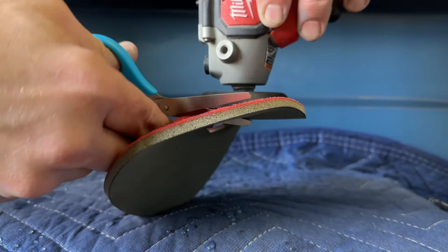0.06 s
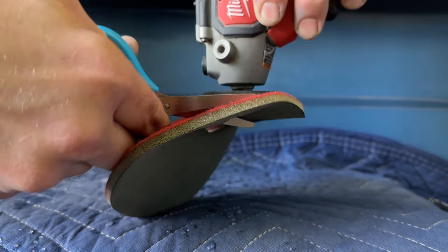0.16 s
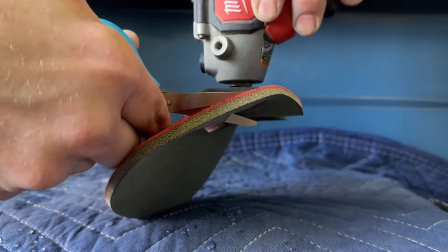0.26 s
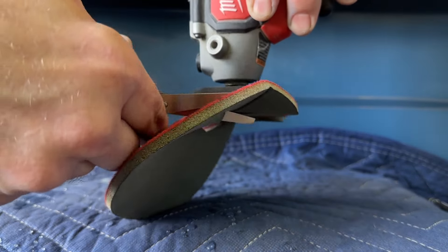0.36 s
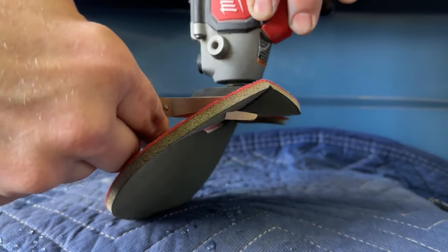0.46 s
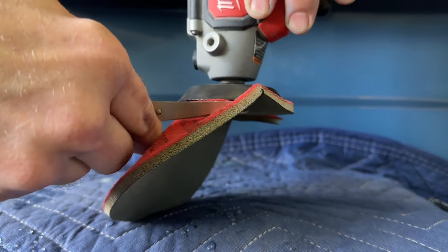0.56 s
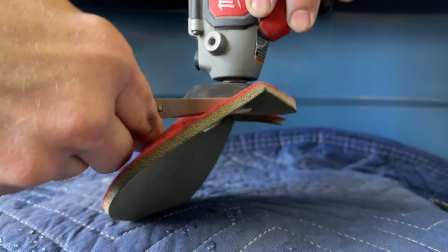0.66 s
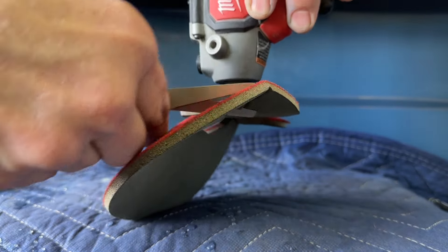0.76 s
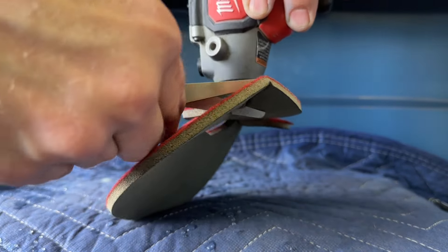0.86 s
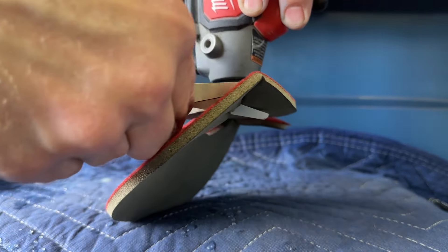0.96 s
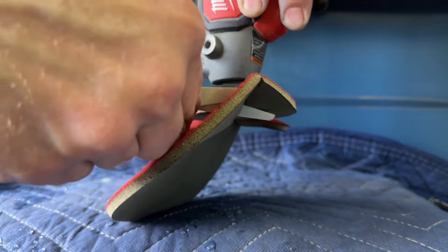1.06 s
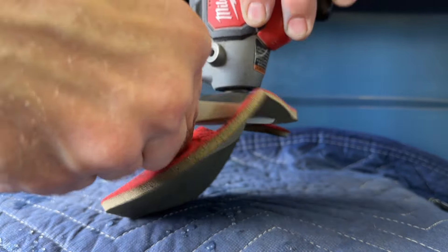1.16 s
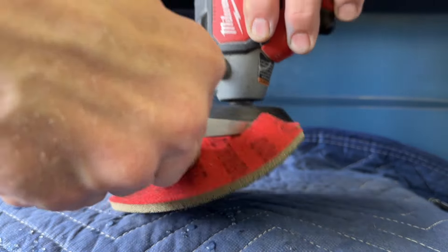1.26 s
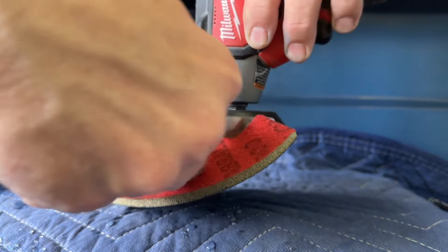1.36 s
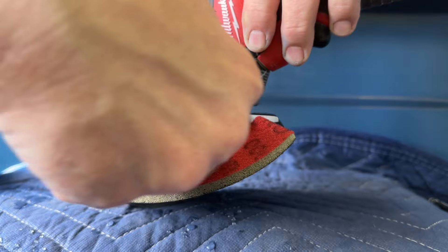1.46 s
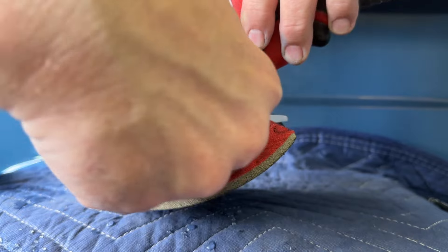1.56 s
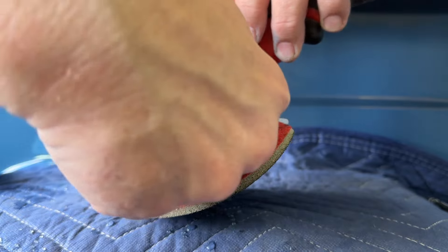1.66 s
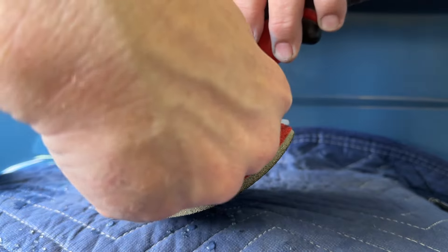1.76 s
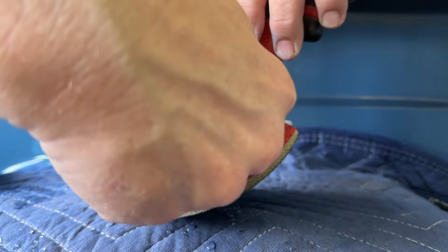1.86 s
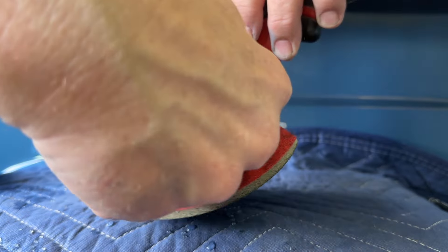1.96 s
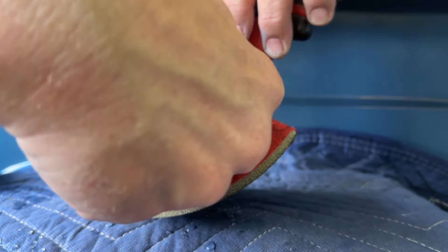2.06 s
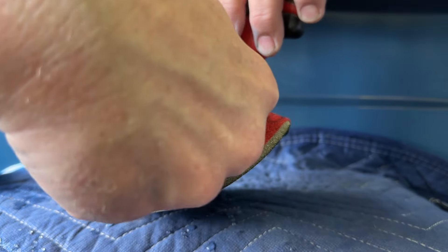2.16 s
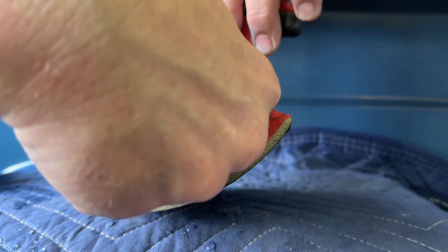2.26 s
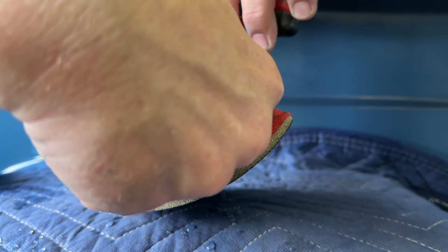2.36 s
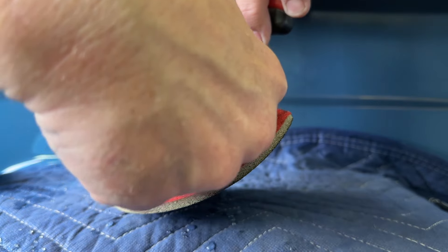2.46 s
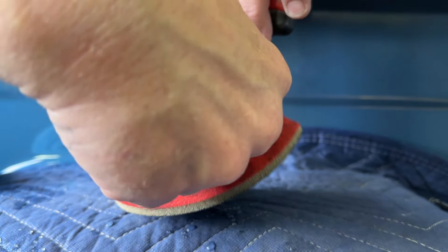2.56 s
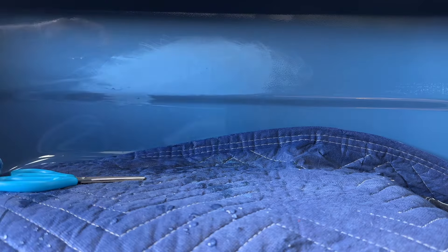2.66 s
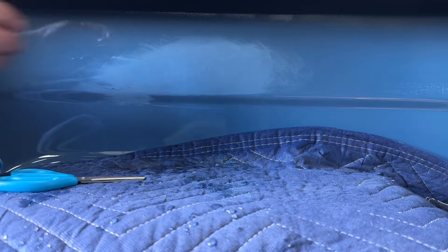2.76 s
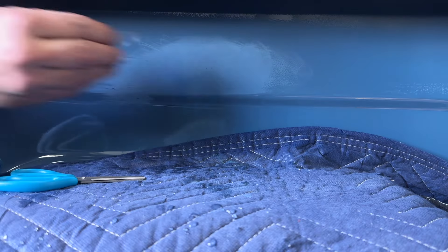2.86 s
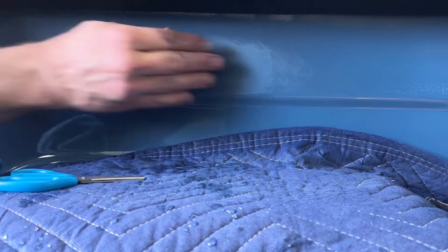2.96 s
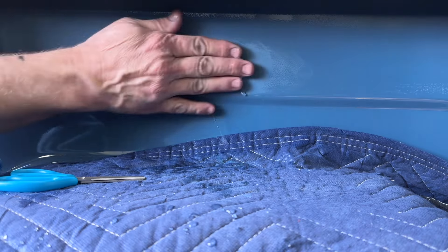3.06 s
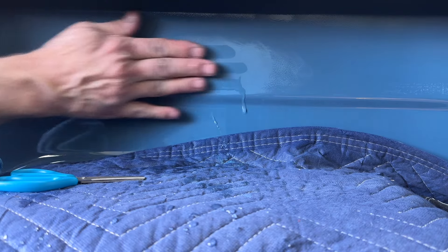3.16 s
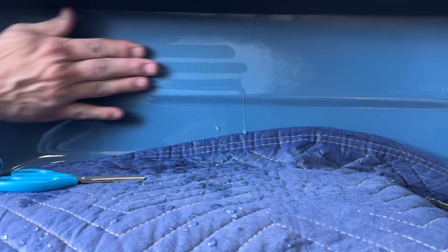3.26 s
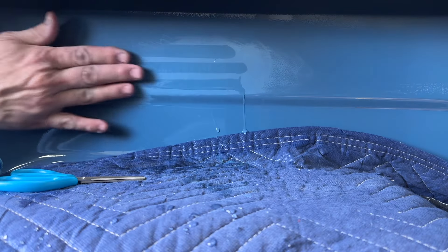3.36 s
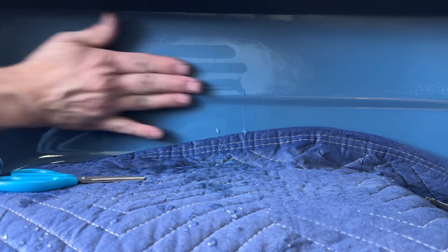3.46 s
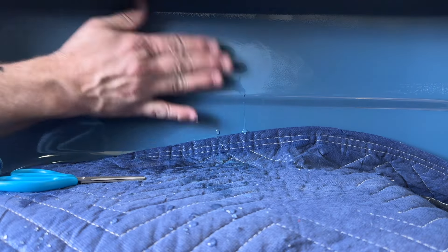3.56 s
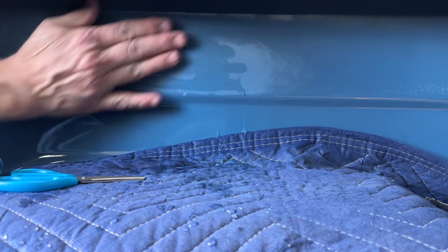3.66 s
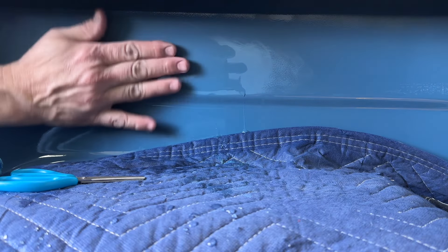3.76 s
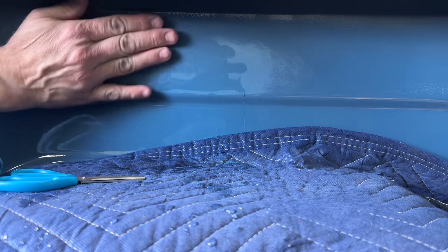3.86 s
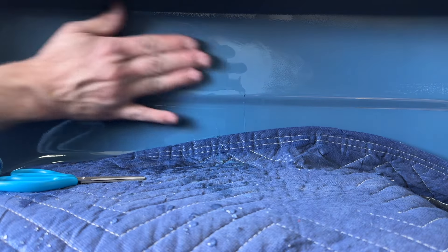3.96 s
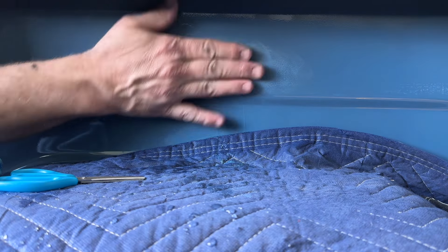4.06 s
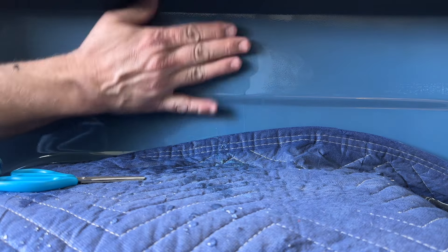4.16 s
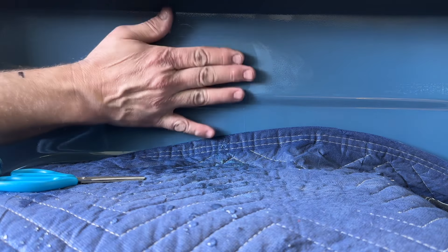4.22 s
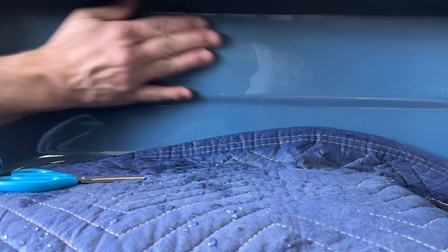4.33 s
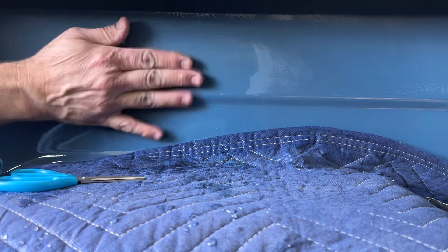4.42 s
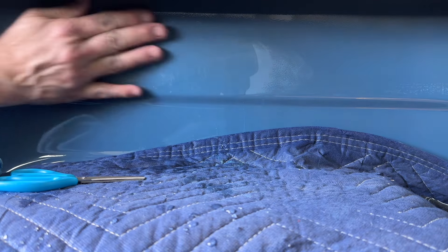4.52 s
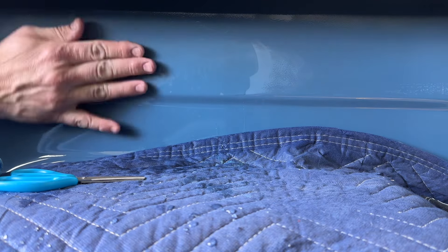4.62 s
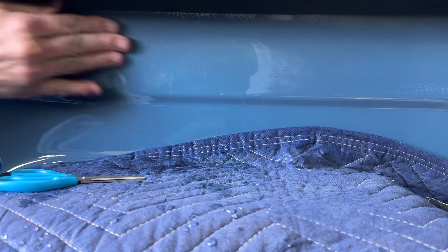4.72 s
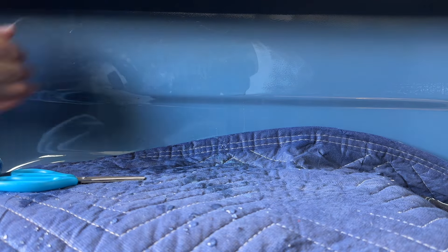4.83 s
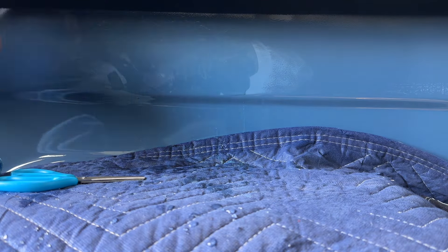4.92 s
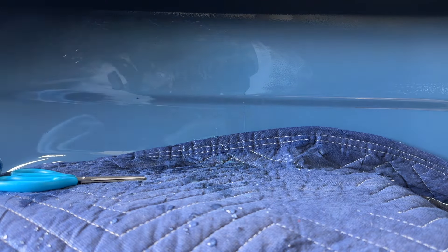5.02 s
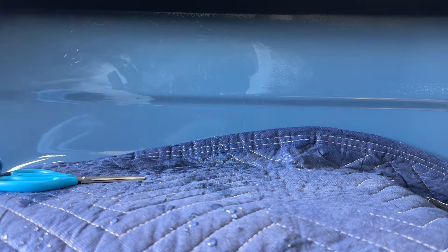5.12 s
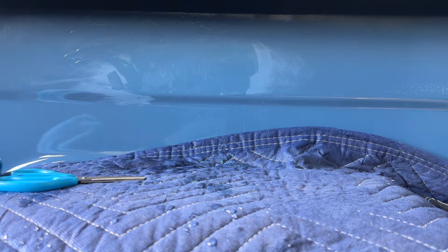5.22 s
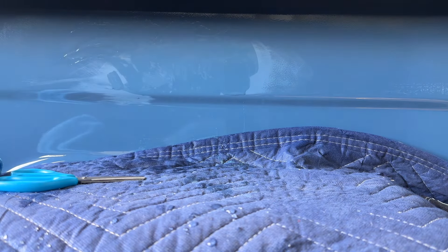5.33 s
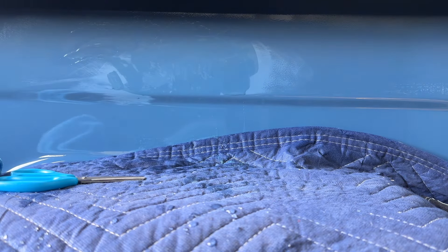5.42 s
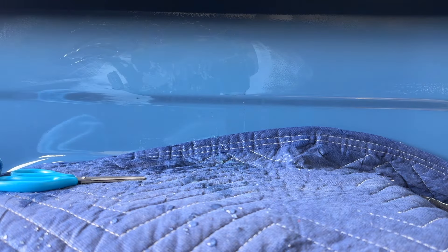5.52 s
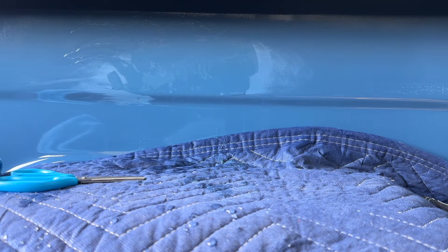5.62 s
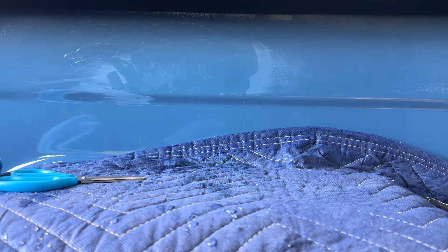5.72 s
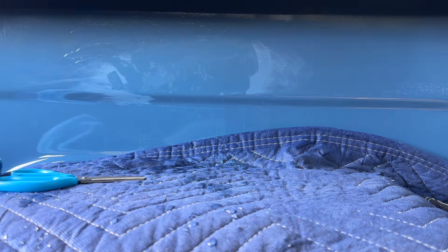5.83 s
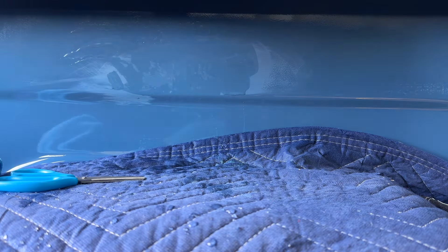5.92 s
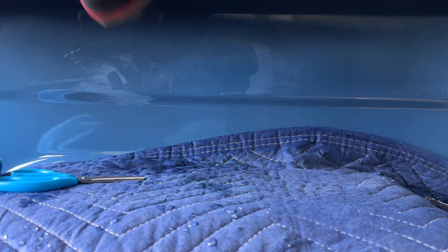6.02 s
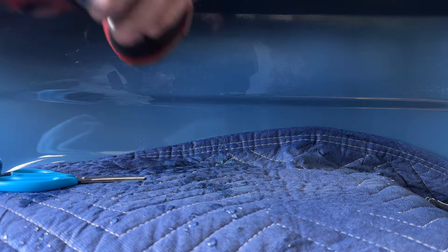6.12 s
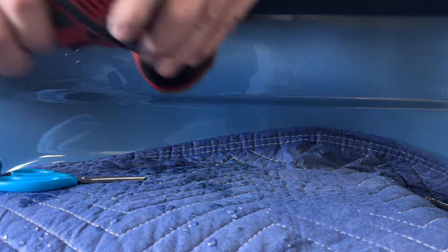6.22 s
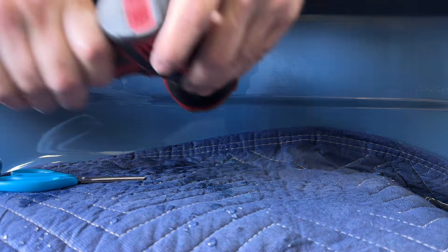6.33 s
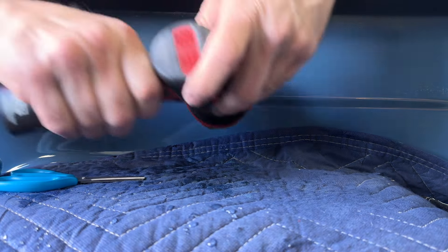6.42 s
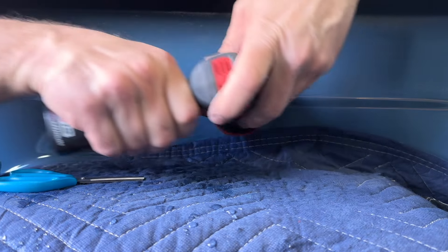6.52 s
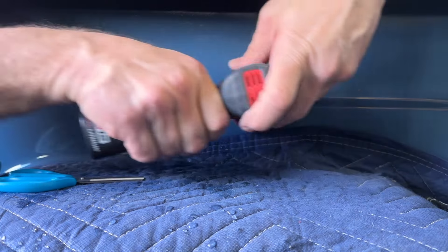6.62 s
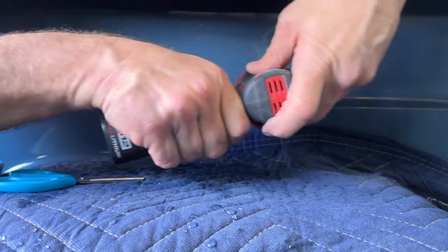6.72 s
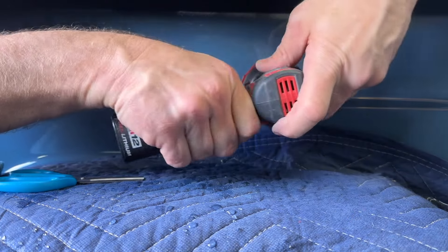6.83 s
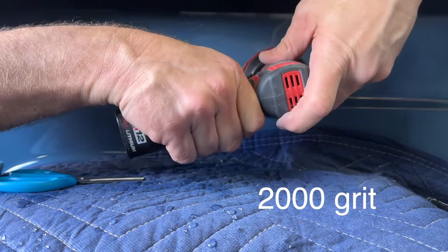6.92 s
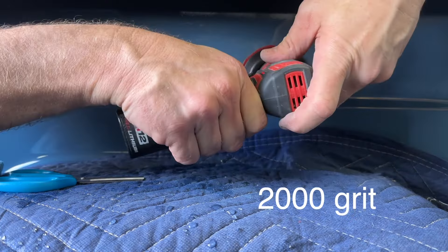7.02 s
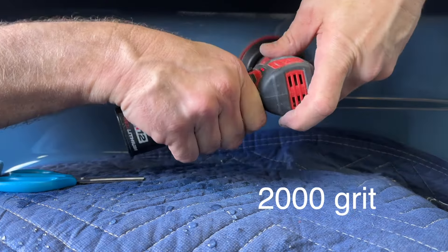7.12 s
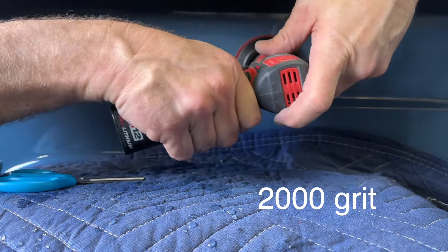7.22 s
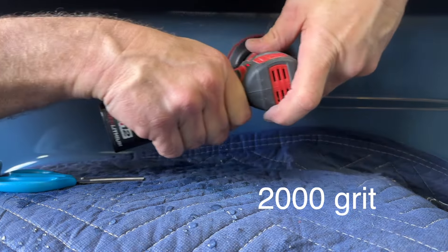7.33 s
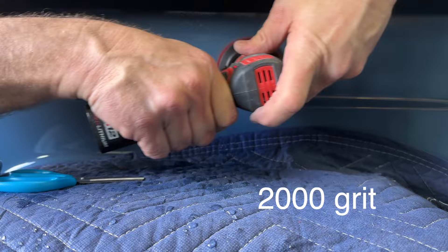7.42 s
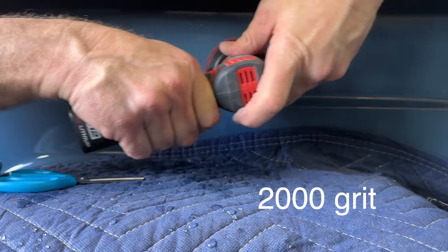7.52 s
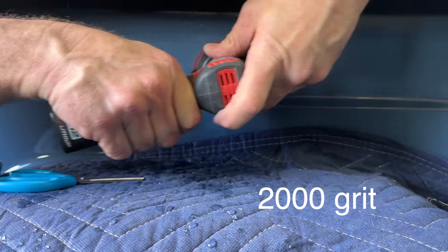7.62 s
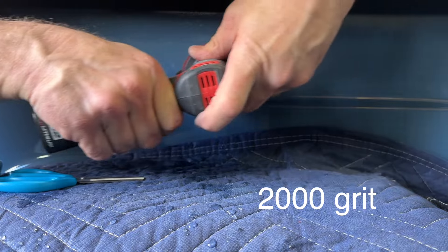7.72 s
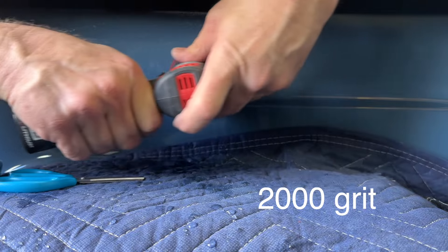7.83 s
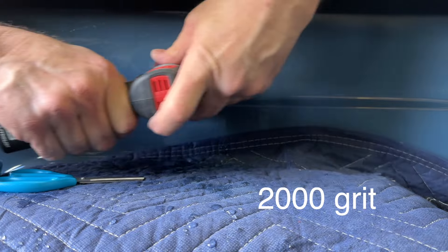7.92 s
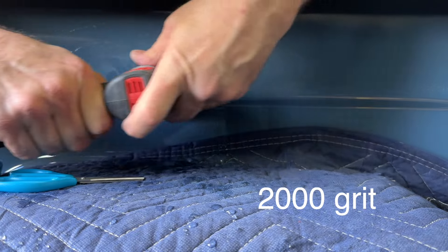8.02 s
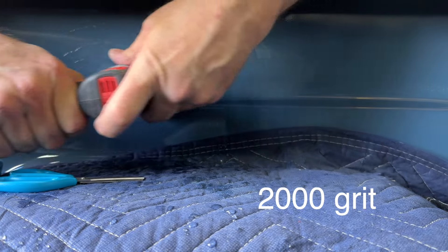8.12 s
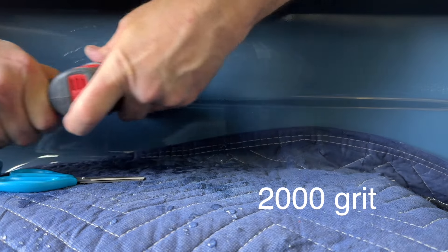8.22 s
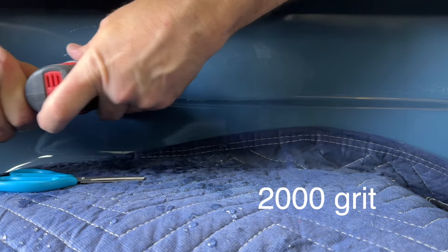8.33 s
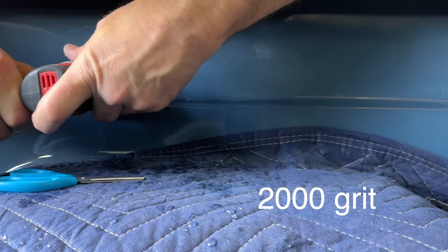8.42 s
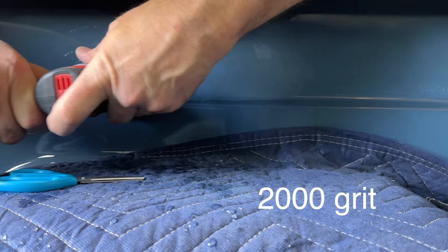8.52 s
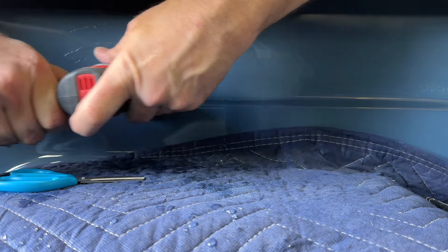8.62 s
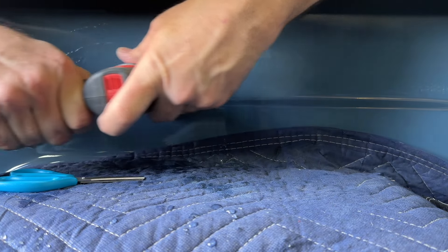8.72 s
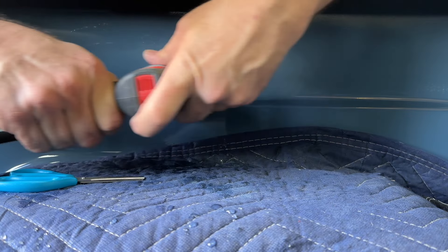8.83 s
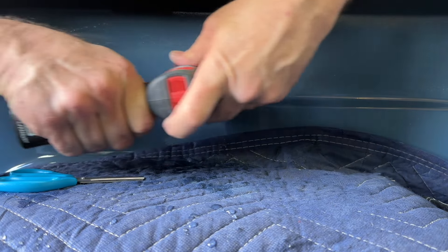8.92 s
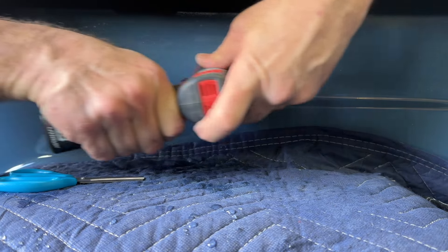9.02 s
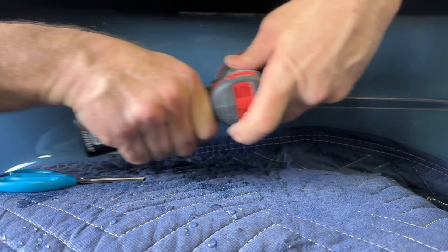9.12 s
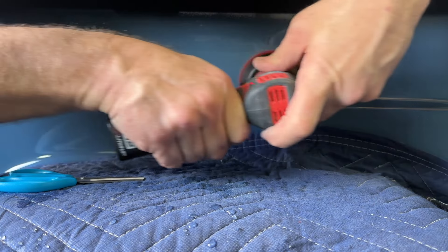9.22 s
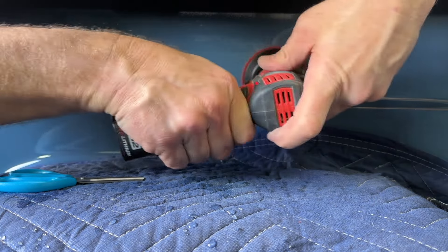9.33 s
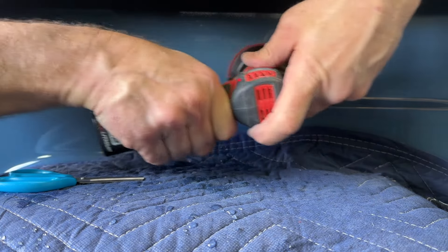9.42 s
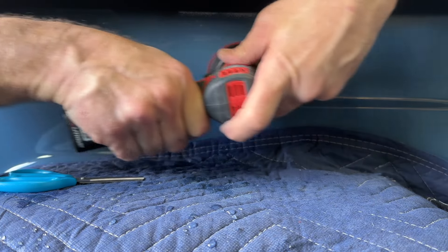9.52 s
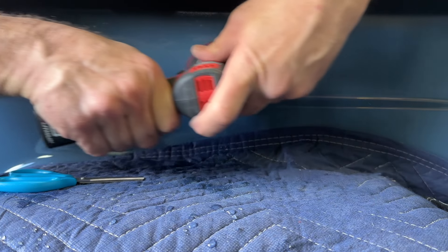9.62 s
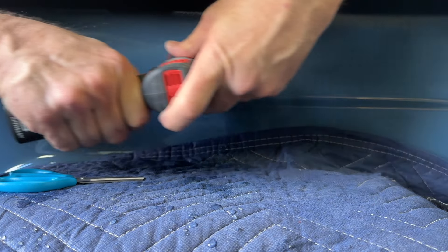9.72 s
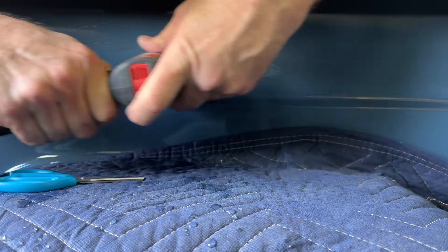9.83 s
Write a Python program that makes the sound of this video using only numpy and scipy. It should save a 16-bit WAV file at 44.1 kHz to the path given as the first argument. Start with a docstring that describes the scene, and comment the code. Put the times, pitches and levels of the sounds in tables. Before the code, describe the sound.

In a workshop with low rumble and a faint distant compressor throb, scissors close to a stereo microphone knock, crunch and snap through a foam-backed disc. A hand slaps a steel panel with a low boom and rubs softly. After small scuffs, a cordless polisher starts abruptly, its whine rising and sagging over gritty gear noise and hiss, still running at the end.

```python
"""Scissors knock, crunch and snap through a foam-backed sanding disc close to a stereo microphone pair.
A palm then slaps a painted steel panel, ringing its modes, and rubs over it as shaped noise.
A cordless polisher spins up on the panel: lines at multiples of its rotor speed rise and sag with the load,
over coloured noise for gear grind, fan air and abrasive hiss, and two droning panel modes.
Behind it all lies a workshop's rumble and the throb of a compressor far off, as slow fluttering lines."""
import sys
import numpy as np
from scipy import signal
from scipy.fft import rfft, irfft, next_fast_len
from scipy.io import wavfile
from scipy.ndimage import uniform_filter1d

SR = 44100
rng = np.random.default_rng(int(sys.argv[2]) if len(sys.argv) > 2 else 0)


def transcribe(signal):
    """Save signal, clipped to [-1, 1], as a 16-bit WAV file at the path in sys.argv[1]."""
    frames = np.atleast_2d(signal).T
    limited = np.clip(frames, -1, 1)
    pcm = np.round(limited * 32767).astype(np.int16)
    wavfile.write(sys.argv[1], SR, pcm)


N = 435708
T = np.arange(N) / SR
LEFT_RIGHT = np.array([[1], [-1]])

# bright ring of steel or gears on contact: (frequency [Hz], relative level [dB])
RING = [(500, -34), (2000, -13), (2550, -10), (3050, -17), (3700, -8.5), (4200, -8), (4650, -8),
        (5300, -12), (6450, -8), (7000, -6), (7700, -9), (8500, -6), (9300, -8.5), (13000, -14.5)]
# crisp top of a steel or skin contact: (frequency [Hz], relative level [dB])
PING = [(3000, -48.5), (10000, -11.5), (13000, -5), (15000, -2.5), (16500, -14)]
# skin, foam and cloth rubbing: (frequency [Hz], relative level [dB])
RUB = [(1500, -7), (2500, -1.5), (4000, -2.5), (6000, -1), (8500, 3), (11000, -2), (13500, -12.5),
       (15500, -9)]
# low flexing of the foam: (frequency [Hz], relative level [dB])
FLEX_TONE = [(120, -14.5), (190, 4.5), (255, 11), (315, -0.5), (385, 4), (460, -7.5), (560, -17.5),
             (1200, -36.5)]
START_S, FULL_HZ = 7.008, 302  # trigger pull; the rotor's full speed in turns a second


def amp(db):
    """Decibels to gain."""
    return 10 ** (np.asarray(db) / 20)


def unit(x):
    """Scales to rms 1."""
    return x / np.sqrt(np.mean(x ** 2) + 1e-20)


def read(points, hz):
    """Reads a table on a log-frequency axis."""
    f, value = np.transpose(points)
    return np.interp(np.log(hz + 1), np.log(f + 1), value)


def add(mix, s, sound):
    """Mixes a sound in at time s, cut off at the end of the mix."""
    part = mix[..., round(s * SR):][..., :sound.shape[-1]]
    part += sound[..., :part.shape[-1]]


def level(points):
    """Gain over time from rows (time [s], level [dB])."""
    return amp(np.interp(T, *np.transpose(points)))


def swells(rows, axis=2):
    """Sum of bell-shaped swells, one per row (time [s], half length to 1/e [s], ..), dB from column axis."""
    t = T[::64]
    total = np.zeros(len(t))
    for row in rows:
        distance = (t - row[0]) / row[1]
        total += amp(row[axis]) * np.exp(-np.minimum(distance ** 2, 20))
    return np.interp(T, t, total)


def wander(cutoff_hz):
    """Smooth random motion of rms 1, mostly slower than the cutoff."""
    size = next_fast_len(N)
    hz = np.fft.rfftfreq(size, 1 / SR)
    spectrum = rfft(rng.standard_normal(size)) / (1 + (hz / cutoff_hz) ** 4)
    return unit(irfft(spectrum, size)[:N])


def colour(x, points):
    """Causal, minimum-phase filter with the given spectrum."""
    log_gain = np.log(amp(read(points, abs(np.fft.fftfreq(4096, 1 / SR)))))
    taps = np.fft.ifft(np.exp(np.conj(signal.hilbert(log_gain)))).real[:2048]
    return signal.oaconvolve(x, taps[None], axes=1)[:, :x.shape[1]]


def noise(points, grain_db=0):
    """Coloured stereo noise, its mid at rms 1; grain_db makes it gritty by stepping its level at random."""
    # left-right likeness ahead of the microphones: (frequency [Hz], correlation [-1 to 1])
    likeness = [(60, 1), (140, 0.28), (280, 0.47), (600, 0.45), (1200, 0.21), (2500, 0.7), (4500, 0.35),
                (6500, 0.19), (7700, 0.16), (8500, 0.98)]
    size = next_fast_len(N)
    hz = np.fft.rfftfreq(size, 1 / SR)
    grit = amp(grain_db * np.repeat(rng.standard_normal(size // 32 + 1), 32)[:size])
    mid, other = rfft(rng.standard_normal((2, size)) * grit)
    alike = np.clip(read(likeness, hz), -1, 1)
    side = other * np.sqrt((1 - alike) / (1.001 + alike))
    x = irfft(np.array([mid + side, mid - side]) * amp(read(points, hz)), size)[:, :N]
    return x / np.sqrt(np.mean(x.mean(0) ** 2))


def burst(decay, points, grain_db=3, slips_per_s=SR):
    """A quickly swelling, dying spray of uneven slips, near rms 1 at its crest; fewer slips make it crunch."""
    t = T[:SR // 2]
    decay = max(decay, 1 / SR)
    common, own = rng.standard_normal(len(t)), rng.standard_normal((2, len(t)))
    clumps = amp(grain_db * np.repeat(rng.standard_normal(len(t) // 64 + 1), 64)[:len(t)])
    slips = np.where(rng.random(len(t)) < slips_per_s / SR, 1, .08)
    swell = np.exp(-t / decay) * (1 - np.exp(-t / (0.19 * decay)))
    x = colour((common + 0.86 * own) * clumps * slips * swell, points)
    return x * np.sqrt(decay * SR / 2 / np.sum(x.mean(0) ** 2))


def clack(modes):
    """Struck modes (frequency [Hz], level [dB], time to crest [s]) that are damped within milliseconds."""
    t = T[:SR // 20]
    out = np.zeros(len(t))
    for hz, db, crest in modes:
        out += amp(db) * t / crest * np.exp(1 - t / crest) * np.sin(2 * np.pi * hz * t)
    return out


def ringing(modes):
    """Modes dying freely; neighbouring ones move the metal in opposite directions."""
    t = T[:SR]
    out = np.zeros(len(t))
    for k, (hz, db, t60) in enumerate(modes):
        out += (-1) ** k * amp(db - 60 * t / t60) * np.sin(2 * np.pi * hz * t)
    return out


def resonance(hz, centre_hz, half_width_hz):
    """Gain of a resonance for a tone at hz."""
    return 1 / np.hypot(1, (hz - centre_hz) / half_width_hz)


def lines(turns, orders, flutter, flutter_hz, spread, fade_db=0):
    """Partials (multiple, level [dB rms]) of a rotation, fluttering partly on their own in each ear.

    They start with the rotation; with fade_db the weaker ones fade in and out."""
    knots, slow = np.arange(0, T[-1] + 1, 1 / flutter_hz), np.linspace(0, T[-1], 70)
    out, first = np.zeros((2, N)), np.argmax(turns > 0)
    t = T[first:]
    for multiple, db in orders:
        real, imaginary = rng.standard_normal((2, 2, len(knots)))
        z = real + 1j * imaginary
        mid = np.interp(t, knots, 1 + flutter * z[0])
        side = np.interp(t, knots, spread * (1j + flutter * z[1]))
        fades = amp(fade_db * min(abs(db) / 10, 1) * rng.standard_normal(len(slow)))
        phase = 2 * np.pi * (multiple * turns[first:] + rng.random())
        tone = np.sqrt(2) * amp(db) * np.interp(t, slow, fades) * np.exp(1j * phase)
        mid, side = (mid * tone).real, (side * tone).real
        out[:, first:] += [mid + side, mid - side]
    return out


def room(x, wet_db):
    """Adds the workshop's reflections: sparse random taps, each band dying at its own rate."""
    # decay of the reflections: (frequency [Hz], t60 [s])
    decay_times = [(150, 0.32), (1000, 0.043), (7000, 0.21), (15000, 0.1)]
    size = SR // 2
    taps = rng.standard_normal((2, size)) * (rng.random((2, size)) < .15) * (T[:size] > .004)
    hz, t, z = signal.stft(taps, SR, nperseg=256)
    tail = signal.istft(z * amp(-60 * t / read(decay_times, hz)[:, None]), SR, nperseg=256)[1]
    return x + amp(wet_db) * signal.oaconvolve(x, tail / np.linalg.norm(tail[0]), axes=1)[:, :N]


def scissors():
    """Blades crunch through the flexing foam and snap shut; then their sound, echoes and all, falls silent
    within 8 ms."""
    silent_from_s = 2.668
    cuts = blade_contacts() + foam_in_hand() + edge_crunches() + handle_tick()
    stop = np.clip((silent_from_s - T) / .008, 0, 1)
    # slightly to the left of the microphone
    return (room(cuts, wet_db=-8.5) + room(blades_close(), wet_db=-9)) * stop * amp(LEFT_RIGHT)


def blades_close():
    """Tips tick as a cut ends, then the blades slam and bounce on their stop; hand-damped and free modes."""
    # the closed scissors: (frequency [Hz], relative level [dB], time to crest [s])
    steel = [(231, -23.5, 0.003), (650, -27, 0.0014), (1380, -21.5, 0.00082), (2250, -18, 0.00069),
             (3550, -10.5, 0.00045), (4350, -15.5, 0.0006), (5450, -15, 0.0006), (6800, -6.5, 0.0006),
             (7250, -8.5, .0007), (7980, -6.5, 0.0007), (8600, -7.5, 0.00045), (10070, -10.5, 0.00069),
             (12970, -5, 0.0005), (14100, -14, .0005), (15160, -15, .0006)]
    # impacts of the slam: (time after the snap [s], relative level [dB])
    bounces = [(0, 0.5), (.0014, -16), (.0055, -14.5)]
    # the blade tips: (frequency [Hz], relative level [dB], time to crest [s])
    tips = [(2380, -30, 0.00062), (6400, -8.5, 0.00038), (7700, -13, 0.00045), (13400, -8, .0004),
            (14800, 2, .0005)]
    # the blades ring on: (frequency [Hz], relative level [dB], t60 [s])
    blades = [(5600, -6, .1), (6670, -1, .2), (7424, 1, .2), (8199, -5, .18), (14140, -9, .1)]
    tip_s, snap_s = .6609, 2.5878
    out = np.zeros((2, N))
    for delay, db in bounces:
        add(out, snap_s + delay, amp(-9.5 + db) * clack(steel))
    # the last of the backing gives way, and the foam springs back
    add(out, snap_s, amp(-29) * burst(.004, RING))
    add(out, snap_s, amp(-41) * burst(.008, FLEX_TONE))
    add(out, snap_s, amp(-39) * ringing(blades))
    add(out, tip_s, amp(-25) * clack(tips))
    add(out, tip_s, amp(-61) * ringing(blades))
    return out


def blade_contacts():
    """Each contact of the blades sprays a dull knock, a sparse blade ring and a steel ping."""
    # contacts: (time [s], decay [s], dull knock [dB], blade ring [dB], steel ping [dB])
    snips = [(.4642, 0.007, -56, -52, -58), (0.4731, .009, -53, -52, -60), (.484, .005, -58, -53, -46),
             (0.4885, 0.0047, -58, -48, -43), (0.495, 0.0043, -57, -48, -47), (.5232, .0008, -64, -61, -53),
             (0.6606, 0.0012, -57, -35.5, -26), (0.663, 0.0034, -53, -45, -47),
             (1.076, .0033, -63, -71, -60), (1.1255, 0.0026, -54, -52, -55),
             (1.1298, .003, -36.5, -42.5, -41), (1.144, 0.018, -54, -50.5, -47),
             (1.15, .002, -58, -45, -50), (1.161, 0.0027, -54, -48, -45), (1.175, .003, -62, -54, -52),
             (1.317, 0.0031, -50, -42.5, -51), (1.322, 0.014, -55, -60, -64), (1.843, .001, -70, -63, -62),
             (1.939, 0.0022, -66, -54, -54), (1.956, .003, -51, -49, -50),
             (1.9593, 0.0024, -37.5, -42, -45), (1.9631, 0.0021, -34.5, -38, -50),
             (2.158, 0.005, -56, -64, -73), (2.174, .01, -62, -66, -70)]
    # the dull knock: (frequency [Hz], relative level [dB])
    knock = [(100, -5), (250, 5), (550, -10), (900, 3), (1080, -5.5), (1300, -1.5), (1520, -15), (1750, -7),
             (2100, -18), (2900, -12), (4000, -13.5), (9000, -56)]
    out = np.zeros((2, N))
    for s, decay, knock_db, ring_db, ping_db in snips:
        add(out, s, amp(knock_db) * burst(decay, knock))
        add(out, s, amp(ring_db) * burst(decay, RING, slips_per_s=800))
        add(out, s, amp(ping_db) * burst(decay, PING))
    return out


def edge_crunches():
    """The edges crunch through the abrasive, several times in quick succession."""
    # crunches: (time [s], time to crest [s], level [dB], pitch of the loaded blade [Hz])
    crunches = [(.435, .008, -72, 4500), (.465, 0.01, -57, 4570), (.483, .006, -56, 6400),
                (1.129, .003, -50, 3850), (1.13, .004, -56, 4700), (1.144, 0.0072, -60, 3800),
                (1.148, .007, -62, 4500)]
    out = np.zeros((2, N))
    for s, crest, db, hz in crunches:
        add(out, s, amp(db) * crunch(crest, hz))
    return out


def crunch(crest, hz):
    """Grit breaks between the edges in uneven slips, each briefly ringing the loaded blade."""
    grit_per_s, grit_t60_s = 700, .012
    t = T[:SR // 4]
    slips = rng.standard_normal(len(t)) * (rng.random(len(t)) < grit_per_s / SR)
    slips *= t / crest * np.exp(1 - t / crest)
    x = signal.fftconvolve(slips, ringing([(hz, 0, grit_t60_s)]))[:len(t)]
    return x * np.sqrt(2 * crest * SR / (np.sum(x ** 2) + 1e-20))


def foam_in_hand():
    """The held disc bends with low flexing and creaks, and is never quite still in the grip."""
    # bends: (time [s], half length [s], level [dB])
    bends = [(.11, 0.059, -59.5), (.44, 0.042, -67), (.87, 0.066, -51.5), (1.09, 0.062, -49),
             (1.62, 0.062, -65), (2.12, 0.048, -63.5)]
    # the creak: (frequency [Hz], relative level [dB])
    creak_tone = [(300, -11), (600, -1), (900, 1), (1500, -8.5), (2500, -12.5), (6000, -27.5)]
    creak_db = -26.5  # against the low flexing of a bend
    grip = amp(2 * wander(5))  # sways by 2 dB rms
    bending = swells(bends)
    out = (bending + amp(-71.5) * grip) * noise(FLEX_TONE)
    out += (amp(creak_db) * bending + amp(-69.5) * grip) * noise(creak_tone, grain_db=3.0)
    return out + amp(-81.5) * grip * noise(RUB, grain_db=1.0)


def handle_tick():
    """The plastic handles tick once, as quickly damped modes."""
    # the handles: (frequency [Hz], relative level [dB], time to crest [s])
    handles = [(2320, -2, .0003), (3200, 2, 0.00033), (5200, 1, 0.00016)]
    out = np.zeros((2, N))
    add(out, 1.2018, amp(-41.5) * clack(handles))
    return out


def hands():
    """A palm slaps the panel; skin and cloth rub; the tool scuffs into place."""
    return panel_slaps() + room(handling_scuffs(), wet_db=-2.0) + rubbing_strokes()


def panel_slaps():
    """A soft hand pushes the panel's beating modes; a longer contact dulls them; dense lesser modes boom."""
    # the steel panel: (frequency [Hz], relative level [dB], t60 [s])
    panel = [(51, -13, 1.2), (75.5, -4, 1.2), (141.6, 4.5, 0.63), (164.6, -2, 0.2), (190.5, -10.5, 0.8),
             (223.5, -9.5, 0.45), (266, -24, 0.6), (298, -14.5, 0.55), (343.5, -7.5, 0.31),
             (443, -11.5, 0.39), (620, -15, 0.22)]
    # the hand meets the panel: (time [s], level [dB], half length of the contact [s])
    slaps = [(2.999, -24.5, 0.0013), (3.078, -28, 0.0043), (3.862, -49.5, 0.00021)]
    # dense lesser modes: (frequency [Hz], relative level [dB])
    boom = [(30, -32), (60, -9), (140, 2.5), (210, -3.5), (330, -18.5), (450, -29.5), (540, -39),
            (640, -34.5), (900, -52.5), (3000, -63)]
    split_hz, beating = 10.4, 0.52  # close pairs of modes beat
    out = np.zeros((2, N))
    ring = ringing(panel) * (1 - beating * np.sin(np.pi * split_hz * T[:SR]) ** 2)
    for s, db, half_contact in slaps:
        push = signal.windows.hann(int(2 * half_contact * SR) + 3)
        add(out, s, amp(db) * signal.fftconvolve(ring, push / push.sum()))
        add(out, s, amp(db - 8.5) * burst(0.14, boom, grain_db=1))
    return out


def handling_scuffs():
    """Skin smacks the paint; the tool ticks, scuffs as it is seated and jolts at the start: short sprays."""
    # scuffs: (time [s], decay [s], level [dB])
    scuffs = [(2.995, 0.005, -59), (5.327, 0.0037, -54), (5.54, .004, -60), (6.634, .004, -58),
              (6.6442, .003, -46.5), (6.6478, .005, -48.5), (6.66, 0.028, -55.5), (6.748, .002, -51),
              (6.766, 0.0081, -59), (6.779, 0.014, -55), (6.855, 0.0032, -53.5), (6.861, .01, -59),
              (7.011, 0.0047, -43), (7.018, 0.0035, -35)]
    # their colour: (frequency [Hz], relative level [dB])
    scuff_tone = [(300, 1.5), (750, -2), (1050, 7), (1200, 6), (1450, -3), (2200, 4.5), (2700, -0.5),
                  (3700, -5), (4500, -4), (6000, -13), (9000, -12), (15000, -21)]
    out = np.zeros((2, N))
    for s, decay, db in scuffs:
        add(out, s, amp(db) * burst(decay, scuff_tone))
    return out


def rubbing_strokes():
    """Soft slides of blade and skin over foam, wet paint and cloth: swelling gritty noise."""
    # slides: (time [s], half length [s], rubbing [dB], crisp top [dB])
    strokes = [(.02, 0.056, -72, -79), (.14, 0.03, -65, -84), (1.62, 0.053, -70, -90),
               (1.9, 0.021, -57.5, -58), (2.552, 0.021, -56.5, -71), (3.17, 0.068, -74, -89),
               (3.53, 0.12, -73, -76), (3.72, 0.064, -70.5, -89.5), (3.99, 0.092, -66, -74),
               (4.21, 0.092, -71, -82), (4.47, 0.1, -68, -85), (4.66, 0.06, -69.5, -87),
               (5.23, 0.057, -70, -88), (5.45, 0.11, -61.5, -62.5), (5.62, 0.068, -70.5, -87),
               (5.8, 0.038, -65.5, -73), (5.91, 0.048, -54.5, -63.5), (6.04, 0.03, -69.5, -82),
               (6.36, 0.077, -69.5, -95)]
    rubbing = swells(strokes, axis=2) * noise(RUB, grain_db=2.0)
    return rubbing + swells(strokes, axis=3) * noise(PING, grain_db=3)


def polisher():
    """Rotor and gear lines over grind, fan air and abrasive hiss, as the tool travels along the panel."""
    # place along the panel: (time [s], place [0 right to 1 left])
    travel = [(7.0, 0), (7.5, 0.14), (7.75, 0.33), (8.0, 0.64), (8.3, 0.74), (8.68, 0.77), (8.85, 0.35),
              (9.0, 0.078), (9.3, 0.036), (9.56, 0.2), (9.72, 0.27), (9.88, 0.6)]
    pan_db = 4  # left over right when the tool is at the left end
    running = np.maximum(T - START_S, 0)
    speed = rotor_speed(running)
    turns = np.cumsum(speed) / SR
    place = np.interp(T, *np.transpose(travel))
    left = np.clip(place, 0, 1)
    grab = wander(20)  # the pad grabs unevenly
    trigger = np.minimum(running / .015, 1)

    works = trigger * (gear_grind(turns, left, grab) + fan_air()) + slack_jolts()
    housing = room(near_echoes(works, place), wet_db=-8.0)
    housing += trigger * (gears(turns, speed, left) + drive_tone(running))
    hum = rotor_hum(turns, speed, place) + third_order(turns, speed)
    hum += bearings(turns) + unbalance(turns, speed, place)
    hiss = abrasive_hiss(speed, place, grab)
    pan = amp(pan_db * place * LEFT_RIGHT / 2)
    return housing * pan + trigger * (hum + hiss + panel_drone())


def rotor_speed(running):
    """Rotor turns a second: a quick spin-up, then rising and sagging under load with a slight waver."""
    # course of the speed, ahead of spin-up and waver: (time [s], turns a second [Hz])
    course = [(7.0, 188), (7.3, 208), (7.4, 226), (7.5, 251), (7.6, 265.5), (7.8, 276.2), (8.0, 270.2),
              (8.22, 264.2), (8.38, 273), (8.5, 293.3), (8.6, 298), (8.7, 291), (8.88, 271), (9.1, 275.3),
              (9.3, 287.3), (9.62, 297), (9.72, 294.8), (9.88, 294.5)]
    spin_up_s = .035
    speed = uniform_filter1d(np.interp(T, *np.transpose(course)), size=2000)
    return speed * (1 + 0.001385 * wander(28.8)) * (1 - np.exp(-running / spin_up_s))


def loudness(speed, place, law):
    """Gain that follows speed and place by a law (full speed [dB], per doubling [dB], left end [dB])."""
    full_db, doubling_db, left_db = law
    doublings = np.log2(np.maximum(speed, 1) / FULL_HZ)
    return amp(full_db + doubling_db * doublings + left_db * place)


def gear_grind(turns, left, grab):
    """Gritty gear noise, rattling once a turn, its colour changing with place; the housing chatters."""
    # grind at the right end, then at the left end: (frequency [Hz], relative level [dB])
    right_tone, left_tone = [(100, -16), (280, -9), (420, -14), (560, -6), (690, -10), (840, 3), (1000, -1),
                             (1300, -2.5), (1520, 1.5), (1650, 0), (1790, 3), (1950, -4), (2100, 2),
                             (2220, 0), (2420, 4.5), (2700, 1), (2950, -6.5), (3450, -4), (5500, -14)], [(100, -14), (280, -6.5), (420, -17), (560, -2), (690, 0),
                                            (830, 2), (1000, 2), (1200, -10.5), (1500, 4.5), (1850, -1),
                                            (2200, 3), (2600, -7.5), (2800, -8), (3050, -11), (3500, -3),
                                            (5500, -9)]
    # the grind rises as the pad is pressed on: (time [s], level [dB])
    grind_level = [(7.0, -53), (7.07, -36.5), (7.28, -34.5), (7.43, -33.5), (7.62, -33.5), (7.92, -34),
                   (8.22, -35), (8.45, -34), (8.7, -32.5), (8.79, -32), (8.95, -32.5), (9.33, -31),
                   (9.62, -32), (9.88, -33)]
    # chatter at spin-up and under load: (time [s], half length [s], level [dB])
    chatter = [(7.022, 0.0061, -40), (7.11, 0.025, -39.5), (7.21, 0.022, -43.5), (7.28, 0.017, -45),
               (7.4, 0.037, -43), (8.92, 0.085, -40), (9.64, .08, -41), (9.8, 0.032, -38)]
    # its colour: (frequency [Hz], relative level [dB])
    chatter_tone = [(500, -45), (790, -16), (835, 0), (865, 6), (910, -10), (1040, -12), (1200, -35),
                    (2000, -45)]
    rattle = 1 + 0.1 * np.cos(2 * np.pi * turns)
    grind = np.sqrt(1 - left) * noise(right_tone, grain_db=1.5)
    grind += np.sqrt(left) * noise(left_tone, grain_db=2.0)
    grind *= level(grind_level) * rattle * amp(0.75 * grab)
    return grind + swells(chatter) * noise(chatter_tone)


def fan_air():
    """Smooth rush of fan air."""
    # colour: (frequency [Hz], relative level [dB])
    air_tone = [(900, -4), (3000, -18), (4300, 3), (5200, 6.5), (5900, 6.5), (6600, 9), (7500, -6),
                (8600, 1.5), (10000, -10), (14000, -111)]
    # loudest when the vents face the microphone: (time [s], level [dB])
    air_level = [(7.0, -62), (7.3, -47.5), (7.6, -46.5), (7.85, -40), (8.15, -38), (8.35, -39),
                 (8.65, -37.5), (8.85, -35.5), (9.03, -41.5), (9.58, -42.5), (9.72, -39), (9.88, -36.5)]
    return level(air_level) * noise(air_tone)


def abrasive_hiss(speed, place, grab):
    """Abrasive on paint hisses louder with speed and softer to the left, wavering with the pad's grab."""
    # colour: (frequency [Hz], relative level [dB])
    abrasive = [(2000, -18), (6000, -17), (7500, -5), (8300, 1), (9500, -1), (11000, -5), (12800, 1),
                (14200, 2.5), (15600, -7.5), (17000, -20)]
    # loudness: (at full speed [dB], per doubling of speed [dB], gained at the left end [dB])
    hiss_law = (-31.5, 19, -9.5)
    return loudness(speed, place, hiss_law) * noise(abrasive) * amp(.5 * grab)


def slack_jolts():
    """The gears take up their slack at the start in short ringing sprays."""
    # jolts: (time [s], decay [s], level [dB])
    jolts = [(7.009, .003, -48), (7.016, 0.006, -42)]
    out = np.zeros((2, N))
    for s, decay, db in jolts:
        add(out, s, amp(db) * burst(decay, RING))
    return out


def near_echoes(x, place):
    """Reflections off the panel and arms slide as the tool travels and comb its noise."""
    # reflections: (delay at the right end [ms], delay at the left end [ms], level [dB])
    echoes = [(1.3, 1.9, -28), (2.9, 2.166, -18.5), (4.1, 5.3, -19.5)]
    out = x.copy()
    for right_ms, left_ms, db in echoes:
        delay = (right_ms + (left_ms - right_ms) * place) / 1000
        out += amp(db) * np.array([np.interp(T - delay, T, ear) for ear in x])
    return out


def gears(turns, speed, left):
    """One clear mesh whine among faint orders that change with the tool's place; some squeal for a moment."""
    # the clear whine: (multiple of rotor speed, relative level [dB])
    whine = [(18, 2)]
    # its course: (time [s], level [dB])
    whine_level = [(7.0, -68), (7.6, -60), (7.82, -49.5), (8.2, -46), (8.32, -49), (8.57, -40.5),
                   (8.8, -42), (9.02, -64), (9.26, -45), (9.54, -59), (9.72, -45.5), (9.88, -42)]
    # faint orders at the right end, then at the left end: (multiple of rotor speed, level at full speed [dB])
    mesh_right, mesh_left = [(7, -49), (8, -49), (9, -54), (10, -59), (12, -50), (15, -56), (16, -56),
                             (24, -50)], [(7, -54), (15, -58), (16, -49.5), (20, -51), (21, -54),
                                                 (23, -50), (24, -55)]
    # squeals under load: (time [s], half length [s], level [dB], multiple of rotor speed)
    squeals = [(7.83, 0.13, -49, 23), (8.62, .12, -49, 20), (9.197, .07, -44, 12), (9.78, .13, -45, 20)]
    out = level(whine_level) * lines(turns, whine, flutter=0.35, flutter_hz=90.4, spread=0.47)
    faint = np.sqrt(1 - left) * lines(turns, mesh_right, flutter=0.64, flutter_hz=60, spread=0.46, fade_db=1)
    faint += np.sqrt(left) * lines(turns, mesh_left, flutter=0.55, flutter_hz=80.6, spread=0.5, fade_db=4)
    out += faint * (speed / FULL_HZ) ** 4
    for s, half, db, multiple in squeals:
        squeal = lines(turns, [(multiple, 0)], flutter=0.4, flutter_hz=70, spread=0.5)
        out += swells([(s, half, db)]) * squeal
    return out


def drive_tone(running):
    """The motor drive's tone keeps its pitch, loudest as it starts and then settling."""
    # partials: (multiple of the drive tone, relative level [dB])
    drive = [(1, 0), (3, -22), (4, -31)]
    drive_hz, settled_db, surge_db, settle_s = 1826, -54.5, 12, 0.96
    gain = amp(settled_db + surge_db * np.exp(-running / settle_s))
    return gain * lines(drive_hz * T, drive, flutter=0.079, flutter_hz=27.1, spread=0.35)


def rotor_hum(turns, speed, place):
    """Low rotor orders that set in as the speed passes a threshold."""
    # orders: (multiple of rotor speed, relative level [dB])
    hum_orders = [(2, 0.5), (4, -0.5), (5, -4.5), (6, -6.5), (8, -2)]
    # loudness: (at full speed [dB], per doubling of speed [dB], gained at the left end [dB])
    hum_law = (-47, 2, -2.8)
    wake_hz, wake_width_hz = 237, 6  # in rotor turns a second
    awake = (1 + np.tanh((speed - wake_hz) / wake_width_hz / 2)) / 2
    hum = lines(turns, hum_orders, flutter=0.24, flutter_hz=35.2, spread=0.31)
    return awake * loudness(speed, place, hum_law) * hum


def third_order(turns, speed):
    """The pad, geared down five to one, throbs the third order as it sweeps the housing's resonance."""
    # the order and its sidebands: (multiple of rotor speed, relative level [dB])
    beat = [(2.8, -12), (3, 0), (3.2, -7)]
    # course of the throb, ahead of the resonance: (time [s], level [dB])
    beat_level = [(7.0, -64), (7.5, -45), (7.72, -39), (7.83, -37.5), (8.1, -35.5), (8.34, -40.5),
                  (8.44, -37), (8.49, -40), (8.57, -37.5), (8.72, -40), (8.92, -36.5), (9.08, -43),
                  (9.27, -48), (9.38, -42), (9.47, -48), (9.6, -39.5), (9.88, -46)]
    # the housing: (resonance [Hz], half width [Hz])
    housing = (849, 41)
    out = np.zeros((2, N))
    for multiple, db in beat:
        tone = lines(turns, [(multiple, db)], flutter=.34, flutter_hz=30.2, spread=0.41)
        out += resonance(multiple * speed, *housing) * tone
    return level(beat_level) * out


def bearings(turns):
    """Rough bearing tones at uneven multiples of the rotor speed."""
    # tones: (multiple of rotor speed, relative level [dB])
    bearing = [(5.501, -1), (6.09, 1.5), (7.07, -10.5), (8.65, -13.5)]
    # their course: (time [s], level [dB])
    bearing_level = [(7.0, -63), (7.3, -55), (7.42, -54), (7.65, -48.5), (8.2, -59), (8.55, -49),
                     (8.68, -53), (8.77, -41.5), (8.9, -48), (9.28, -41.5), (9.55, -44), (9.88, -57)]
    return level(bearing_level) * lines(turns, bearing, flutter=0.42, flutter_hz=54.53, spread=0.1)


def unbalance(turns, speed, place):
    """The rotor's unbalance swells as its speed sweeps through a resonance."""
    # loudness: (at full speed [dB], per doubling of speed [dB], gained at the left end [dB])
    unbalance_law = (-47, 13, -4.5)
    # the resonance: (rotor turns a second [Hz], half width [Hz])
    mount = (293, 9)
    tone = lines(turns, [(0.99, 0)], flutter=0.3, flutter_hz=29.3, spread=0.86)
    return loudness(speed, place, unbalance_law) * resonance(speed, *mount) * tone


def panel_drone():
    """The pad keeps two panel modes droning, louder when it catches, over a low shudder."""
    # catches of the pad: (time [s], half length [s], lower mode [dB], upper mode [dB])
    catches = [(7.07, 0.028, -53, -48.5), (7.67, 0.062, -51, -52), (8.3, 0.17, -76, -43.5),
               (8.48, 0.035, -47, -65), (8.83, 0.028, -41, -73), (9.17, 0.15, -43.5, -59),
               (9.32, 0.079, -30.5, -69), (9.61, 0.024, -49, -60), (9.8, 0.037, -45, -77)]
    # shudder on the first pass: (time [s], half length [s], level [dB])
    shudder = [(7.9, 0.78, -44.5)]
    # its colour: (frequency [Hz], relative level [dB])
    shudder_tone = [(25, -35), (50, -3), (85, -8), (130, -13.5), (250, -37), (600, -60)]
    lower_hz, upper_hz = 141.57, 184.106
    lower_db, upper_db = -53, -59.5  # between catches
    lower = lines(lower_hz * T, [(1, 0)], flutter=0.17, flutter_hz=20, spread=0.12)
    lower *= amp(lower_db) + swells(catches, axis=2)
    upper = lines(upper_hz * T, [(1, 0)], flutter=0.23, flutter_hz=25.45, spread=0.16)
    upper *= amp(upper_db) + swells(catches, axis=3)
    return lower + upper + swells(shudder) * noise(shudder_tone)


def workshop():
    """Low rumble and air, with the throb of a distant piston compressor."""
    # rumble and air: (frequency [Hz], relative level [dB])
    ambience = [(15, -51.5), (25, -36), (48, -2.5), (87, -3), (140, -8), (170, -12), (200, -11.5),
                (263, -22.5), (320, -25), (420, -34), (580, -36.5), (900, -35), (1700, -43), (2150, -46.5),
                (2600, -38), (3300, -47.5), (8000, -56), (16000, -68.5)]
    # the compressor: (multiple of its stroke rate, level [dB rms])
    compressor = [(4, -54.5), (5, -51), (6, -55), (8, -55), (14, -67.5), (18, -71.5)]
    stroke_hz = 14.13
    throb = lines(stroke_hz * T, compressor, flutter=0.31, flutter_hz=3.2, spread=0.054)
    return throb + amp(-50.0) * noise(ambience)


def scene():
    """Everything in the workshop."""
    return scissors() + hands() + polisher() + workshop()


def record(dry):
    """The microphone ports turn the treble's phase between left and right through a full cycle; then the band limit."""
    # the microphone pair: (frequency [Hz], stereo width [dB])
    width = [(20, -6), (7700, 3), (8400, -3.5), (8900, 1.5), (9600, 2), (10600, -53.5), (11700, -43),
             (12500, -4.5), (13400, 7.5), (14000, -21)]
    # its phase: (frequency [Hz], lead of left over right [rad])
    twist = [(20, 0), (200, .05), (1200, -.3), (1550, -1.2), (2100, -.4), (3000, -1.5), (4400, -.3),
             (5500, -.7), (7500, -1.2), (8300, 0), (8700, .6), (9200, .8), (9900, 2.2), (10350, 3.13),
             (11800, 3.15), (12400, 4.3), (13300, 5.5), (13800, 6.283)]
    edge_hz = 15900
    size = next_fast_len(N + 4096)
    hz = np.fft.rfftfreq(size, 1 / SR)
    left, right = rfft(dry, size)
    mid = (left + right) / 2
    side = (left - right) / 2 * amp(read(width, hz))
    turn = np.exp(1j * read(twist, hz) / 2)
    ports = irfft(np.array([(mid + side) * turn, (mid - side) / turn]), size)[:, :N]
    band_limit = signal.firwin(511, edge_hz, window=("kaiser", 9), fs=SR)
    return signal.oaconvolve(ports, band_limit[None], "same")


dry = scene()
out = record(dry)
transcribe(out)
```